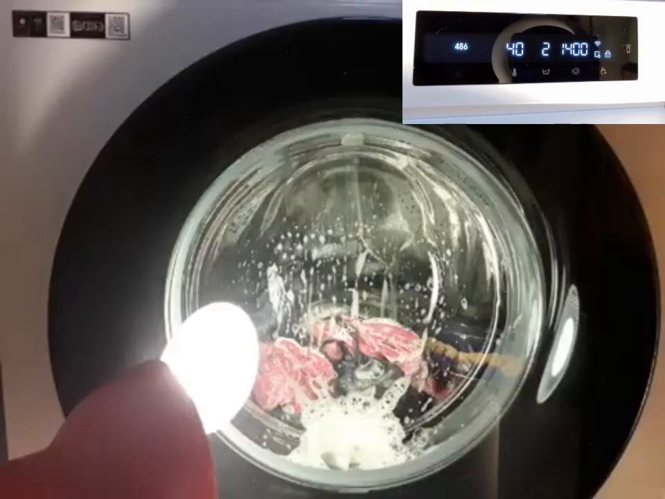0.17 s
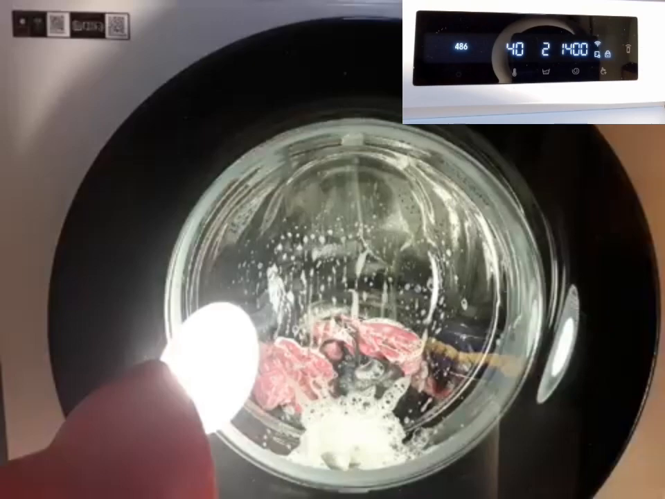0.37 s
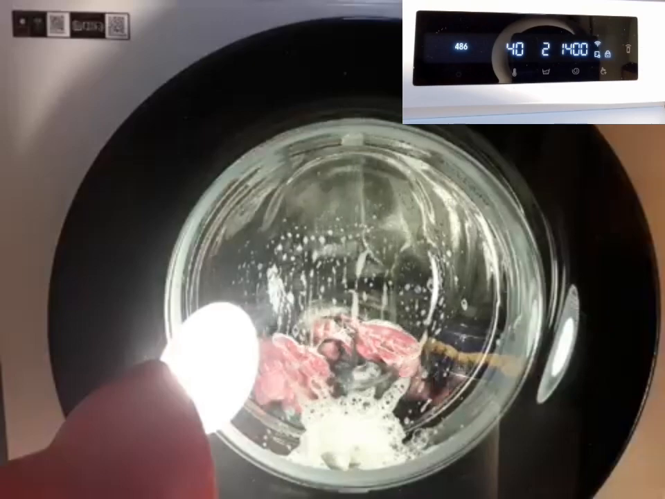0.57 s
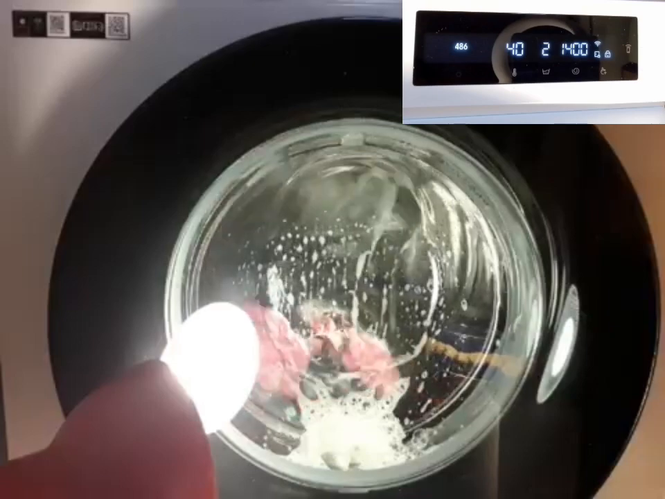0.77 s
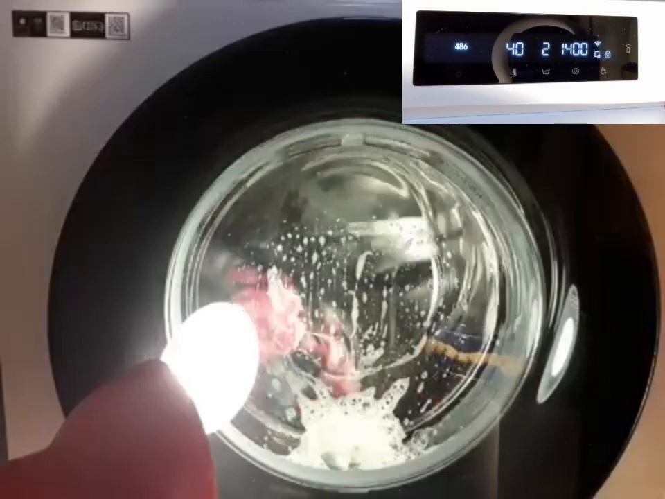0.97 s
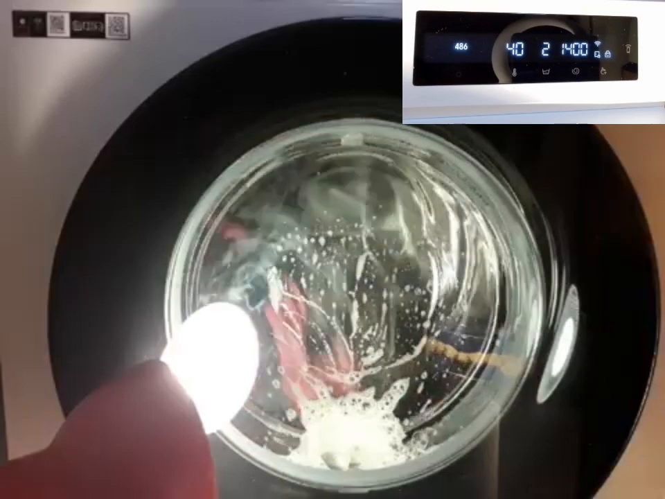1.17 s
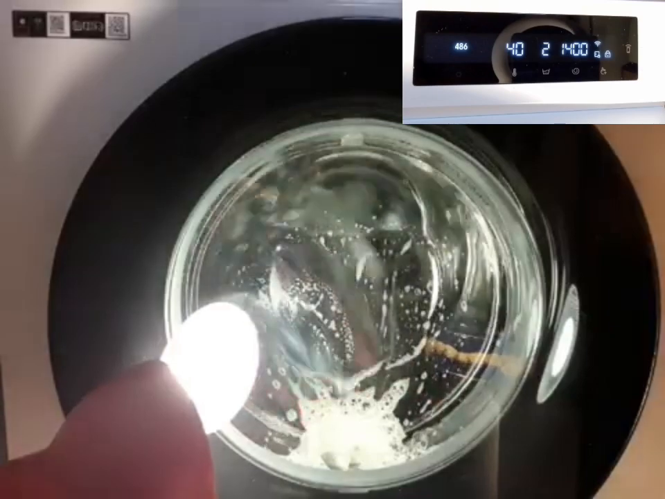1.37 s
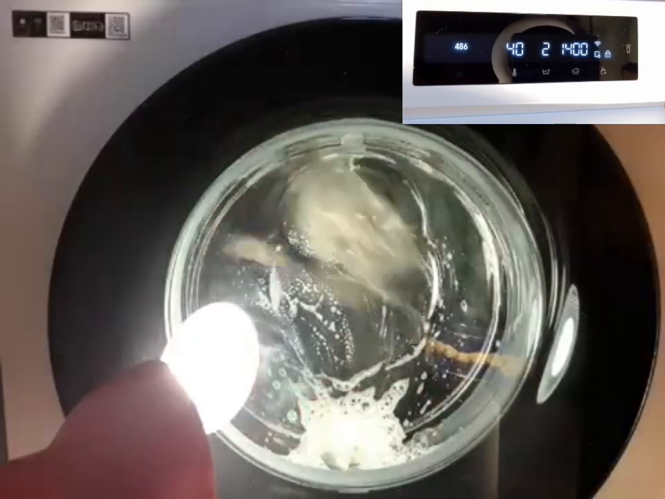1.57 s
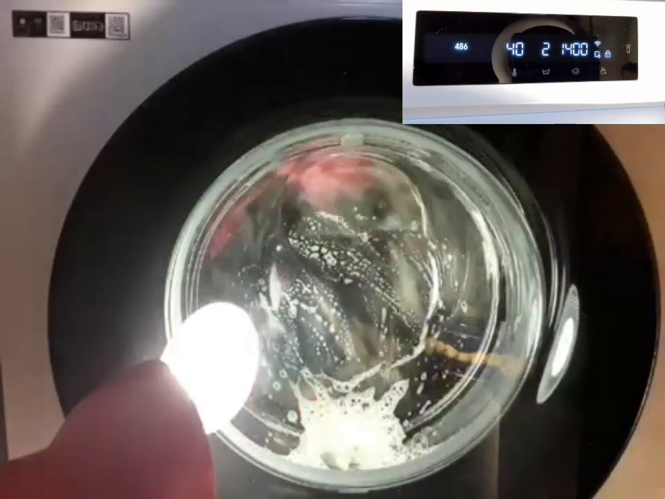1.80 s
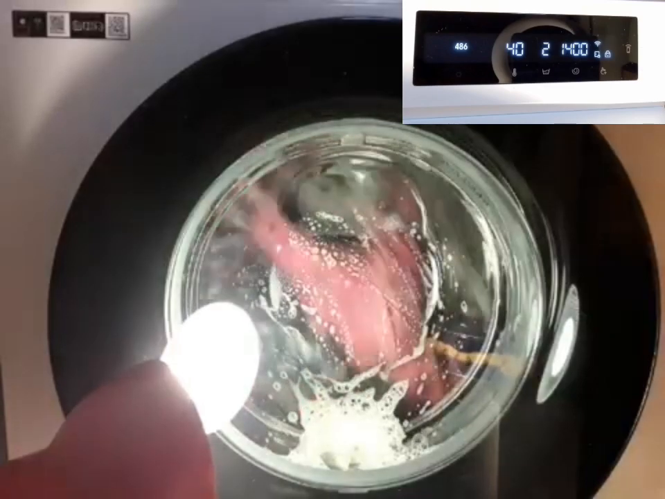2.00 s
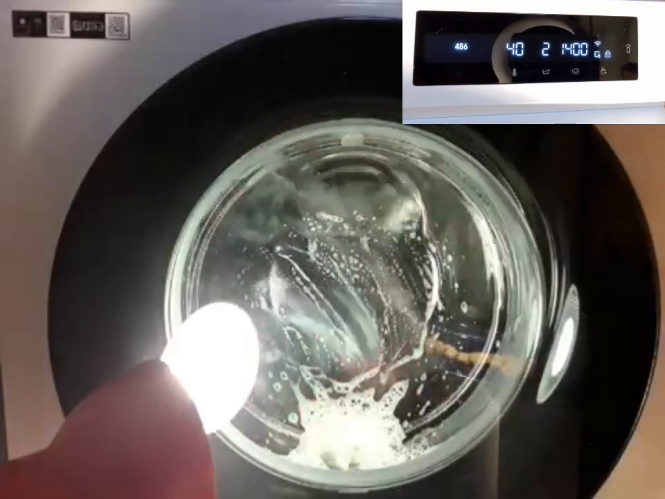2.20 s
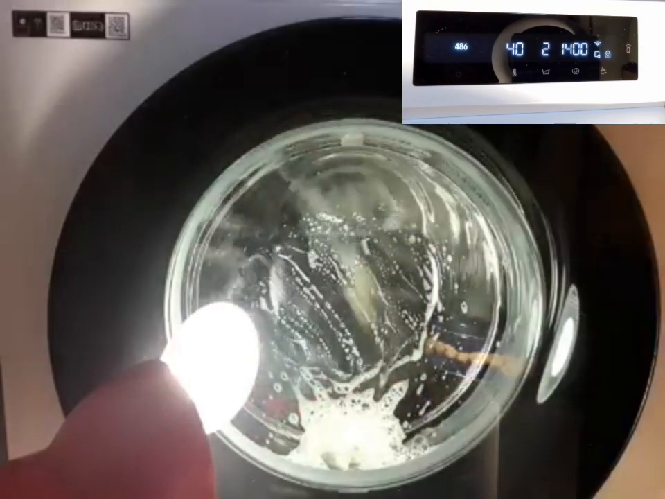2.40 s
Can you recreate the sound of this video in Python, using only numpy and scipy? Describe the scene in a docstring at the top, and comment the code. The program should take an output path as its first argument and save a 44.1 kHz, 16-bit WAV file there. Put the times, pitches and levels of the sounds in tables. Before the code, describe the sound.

Close by in a small room, a washing machine drum begins to turn after a brief hush. Its motor hums softly as water churns and wet laundry falls with hollow thumps and splashes, with one faint rubbery squeal.

```python
"""A front-loading washing machine starts to turn after a pause, in a small hard-walled room.
The motor takes up with a clunk and hums, water sloshes in the drum, and wet rubber sticks and
slips in a thin squeal. Soaked laundry drops with thumps that ring the tub and throw splashes
of droplets. The drive whines faintly throughout."""
import sys
import numpy as np
from scipy import signal
from scipy.fft import rfft, irfft, next_fast_len
from scipy.io import wavfile
from scipy.ndimage import map_coordinates

SR = 44100
rng = np.random.default_rng(int(sys.argv[2]) if len(sys.argv) > 2 else 0)


def digitize_waveform(pressure):
    """Quantize a signal to 16-bit integers and store it at the path in sys.argv[1].

    Rows of a 2-D input are taken as channels; values are limited to [-1, 1].
    """
    field = np.atleast_2d(pressure).T
    bounded = np.clip(field, -1, 1)
    quanta = np.round(bounded * 32767).astype(np.int16)
    wavfile.write(sys.argv[1], SR, quanta)


N = 107912
T = np.arange(N) / SR


def amp(db):
    """Decibels to gain."""
    return 10 ** (np.asarray(db) / 20)


def unit(x):
    """Scale to rms 1."""
    return x / np.sqrt(np.mean(x ** 2) + 1e-20)


def eq(points):
    """An EQ curve through (Hz, dB) points on a log axis: gain as a function of frequency."""
    point_hz, db = np.transpose(points)
    return lambda hz: amp(np.interp(np.log(hz + 1), np.log(point_hz), db))


def curves(rows):
    """Automation: one value per sample for each column after the time."""
    times, *columns = np.transpose(rows)
    return [np.interp(T, times, column) for column in columns]


def wobble(rate):
    """A smooth random curve, rate knots a second."""
    return map_coordinates(rng.standard_normal(int(N * rate / SR) + 4), [T * rate])


def filtered(x, response):
    """Shape the spectrum of x by a gain that depends on frequency."""
    size = next_fast_len(N + SR // 2)
    return irfft(rfft(x, size) * response(np.fft.rfftfreq(size, 1 / SR)), size)[:N]


def noise(response):
    """Coloured noise of rms 1."""
    return unit(filtered(rng.standard_normal(N), response))


def phase(hz):
    """Running phase of a moving pitch."""
    return 2 * np.pi * np.cumsum(hz) / SR


def burst(start, rise, t60, hold=0):
    """Envelope: a straight rise, a hold, then an exponential decay; times in seconds."""
    age = np.maximum(T - start, 0)
    return np.minimum(age / rise, 1) * amp(-60 * np.maximum(age - rise - hold, 0) / t60)


def room(x, tail_db=5.5):
    """Close hard walls add a short dense tail."""
    tail = rng.standard_normal(N) * burst(0.002, rise=0.0046, t60=0.23)
    return x + amp(tail_db) * signal.fftconvolve(x, tail / np.linalg.norm(tail))[:N]


# The colour of the quiet room. Each row: frequency in Hz, gain in dB.
ROOM_TONE_EQ = [(25, -8), (120, 1.5), (280, -2.5), (400, -8.5), (510, -6.5), (650, -14.5), (900, -18.5),
                (1500, -24), (2200, -24.5), (3200, -32), (5000, -36.5), (7600, -23.5), (9200, -24),
                (10500, -31.5), (11500, -24), (12500, -33), (13200, -26), (15000, -33.5)]


def room_tone(level_db=-71, swell_db=2):
    """A low bed of noise that swells slightly at the start."""
    return amp(level_db + swell_db * np.minimum(T / 0.34, 1)) * noise(eq(ROOM_TONE_EQ))


def drive_whine(idle_hz=11810, idle_db=-78, load_hz=112, load_db=4, jitter_hz=110):
    """The drive's thin unbroken whine rises a little in pitch and level with the load."""
    load = np.clip((T - 0.93) / 0.45, 0, 1)
    tone = np.sin(phase(idle_hz + load_hz * load + jitter_hz * wobble(900)))
    flutter = 1 + 0.25 * wobble(400)
    return amp(idle_db + load_db * load) * flutter * tone


# Blows on the tub. Each row: start in seconds, level in dB, brightness in Hz, low cut in Hz,
# contact time in seconds, pitch of the trapped air pocket in Hz, its level over the blow in dB.
BLOWS = [(.203, -74.5, 593, 250, 0.058, 283, 8.5), (0.449, -71, 880, 200, 0.0035, 620, -5),
         (.652, -55.5, 500, 90, 0.031, 251.5, 2.5), (.947, -53.5, 533, 170, 0.011, 578.4, 1),
         (1.139, -33, 816, 128, 0.028, 438, -7.5), (1.33, -51, 450, 170, .015, 181, 3),
         (1.393, -26, 735, 260, 0.0063, 617.7, -0.5), (1.416, -26.5, 660, 230, 0.027, 307.4, -7.5),
         (1.467, -29.5, 1530, 214, 0.011, 247, -4), (1.499, -34, 560, 120, 0.009, 174, 1.5),
         (1.736, -54, 330, 152, .02, 238, 2), (1.868, -48.5, 330, 200, 0.0052, 313, 1.5),
         (2.137, -43, 140, 75, 0.032, 131.1, 9), (2.200, -50, 696, 75, 0.022, 125, -12),
         (2.246, -46.5, 650, 90, 0.014, 286.8, 3.5), (2.380, -20.5, 1240, 397, 0.018, 287, -14.5),
         (2.411, -23.5, 816, 270, 0.006, 319, 3)]
# The tub's ringing modes. Each row: pitch in Hz, level in dB, time to fall 60 dB in seconds.
TUB_MODES = [(80, -7, .3), (130, -7, .25), (173, -2, .28), (246, -4, .3), (296, -2, .18), (320, -1, .2),
             (432, 0, .28), (589, -1, .2), (644, 0, .2), (712, -1, .22), (754, -4, .2), (815, -7, .18),
             (908, -5, .17), (1293, -6, .17), (1522, -11, .17)]
# The colour of the tub's lesser modes. Each row: frequency in Hz, gain in dB.
CLATTER_EQ = [(40, -20), (75, 6), (120, -4), (330, 6), (440, -5), (520, -3), (650, 1.5), (950, -4),
              (1100, -6), (1900, -9.5), (2800, -17), (4000, -14), (7500, 7.5), (12000, -13)]


def thumps(attack_s=0.0015, slap_db=-1, ring_db=-8, clatter_db=-2.5):
    """Each blow slaps, then rings the tub, a clatter of lesser modes and air under the cloth."""
    out = np.zeros(N)
    for start, db, bright_hz, low_hz, contact_s, pocket_hz, pocket_db in BLOWS:
        def contact(hz):
            """The band a blow excites: soft contact dulls the top."""
            return 1 / np.sqrt((1 + (hz / bright_hz) ** 7.76) * (1 + (low_hz / (hz + 1)) ** 5))

        phase_per_hz = 2 * np.pi * np.maximum(T - start, 0)
        ring = np.zeros(N)
        for k, (hz, mode_db, t60) in enumerate(TUB_MODES):
            strength = contact(hz) * amp(mode_db + rng.normal(0, 2))
            envelope = burst(start, attack_s + 0.5 / hz, t60, hold=contact_s / 2)
            detuned_hz = hz * (1 + rng.normal(0, 0.0051))
            ring += (-1) ** k * strength * envelope * np.sin(detuned_hz * phase_per_hz)
        clatter = noise(lambda hz: eq(CLATTER_EQ)(hz) * contact(hz))
        clatter *= burst(start, attack_s, t60=0.31, hold=contact_s)
        pocket = np.sin(pocket_hz * phase_per_hz) * burst(start, rise=0.0032, t60=0.25, hold=contact_s)
        slap = np.sin(0.726 * bright_hz * phase_per_hz) * burst(start, rise=1 / bright_hz, t60=0.026)
        out += amp(db) * (amp(slap_db) * slap + amp(ring_db) * ring
                          + amp(clatter_db) * clatter + amp(pocket_db) * pocket)
    return out


def bubbles(per_s, centre_hz, cycles, spread=0.265, glide=0.3, scatter_db=3):
    """A stream of small ringing bubbles whose pitch rises as they fade; rms 1."""
    draws = rng.uniform(0.001, 0.999, (int(per_s * N / SR), 3))
    when, pitch, strength = np.hsplit(draws, 3)
    hz = np.clip(centre_hz * (pitch / (1 - pitch)) ** spread, 80, 12000)
    t = np.arange(SR // 25) / SR
    life = t * hz / cycles  # reaches 1 when the bubble is 60 dB down
    ring = np.sin(2 * np.pi * hz * t * (1 + glide * np.minimum(life, 1) / 2)) * amp(-60 * life)
    ring *= amp(-scatter_db * np.log(np.maximum(strength, 0.04)))  # a few stand out
    samples = (when * N).astype(int) + np.arange(len(t))
    return unit(np.bincount(samples.ravel(), ring.ravel(), N)[:N])


def droplets():
    """Dense droplets pinging in the room, on a hiss."""
    return rng.standard_normal(N) + amp(-6) * room(bubbles(per_s=900, centre_hz=2680, cycles=4.1))


# Water moving in the drum. Each row: time in seconds, body level in dB, fizz level in dB.
SLOSH_LEVELS = [(.62, -110, -110), (.7, -70, -94), (.85, -65, -91), (1.06, -49, -67), (1.12, -53.5, -66.5),
                (1.25, -49.5, -63), (1.38, -46, -60), (1.56, -39.5, -58), (1.7, -48, -61.5),
                (1.83, -43.5, -61), (1.96, -53.5, -66), (2.03, -49.5, -64.5), (2.09, -41.5, -65.5),
                (2.16, -45.5, -66.5), (2.27, -37, -58), (2.34, -47, -64), (2.44, -38.5, -57)]
# The hollow colour of the water's body. Each row: frequency in Hz, gain in dB.
WATER_EQ = [(30, -40.5), (70, -5), (130, 3.5), (165, -1.5), (215, 0.5), (280, 0), (350, -5), (432, 1.5),
            (510, -10), (620, -4.5), (900, -10.5), (1300, -19), (2200, -42), (4000, -62)]
# The bright colour of the suds. Each row: frequency in Hz, gain in dB.
SUDS_EQ = [(400, -18), (1200, 2.5), (2000, -5.5), (3000, -14.5), (4500, -19.5), (6200, -14.5), (7700, -8),
           (9500, -17.5), (14000, -22)]


def slosh(bubble_db=-3, surge_db=1.5):
    """Churning water: a hollow body with bubbles in it, and fizzing suds above."""
    body_db, fizz_db = curves(SLOSH_LEVELS)
    churn = noise(eq(WATER_EQ))
    gurgle = room(bubbles(per_s=220, centre_hz=423.5, cycles=35))
    body = unit(churn + amp(bubble_db) * unit(filtered(gurgle, eq(WATER_EQ))))
    fizz = unit(filtered(droplets(), eq(SUDS_EQ)))
    return amp(surge_db * wobble(24.91)) * (amp(body_db) * body + amp(fizz_db) * fizz)


# The partials of the motor's hum. Each row: pitch in Hz, level in dB.
HUM_PARTIALS = [(125, -57), (248, -58)]


def motor_hum(start_s=0.64, rise_s=0.07, fall_db_per_s=5, flutter_db=2.5, waver=0.02566, rough=0.32):
    """A rough, wavering hum, strongest as the motor starts."""
    age = np.maximum(T - start_s, 0)
    effort = np.minimum(age / rise_s, 1) * amp(-fall_db_per_s * age)
    hum = np.zeros(N)
    for hz, db in HUM_PARTIALS:
        level = amp(db + flutter_db * wobble(22))
        tone = np.sin(phase(hz * (1 + waver * wobble(29.9))))
        growl = noise(lambda f: 1 / (1 + ((f - hz) / 45) ** 2))  # a narrow band around the partial
        hum += level * (tone + rough * growl)
    return effort * hum


# Water thrown against the door and drum. Each row: start in seconds, level in dB, then rise,
# hold and time to fall 60 dB in seconds, and the fine spray's level over the coarse splash in dB.
SPLASH_HITS = [(0.661, -73, .004, 0.023, 0.23, -28), (1.063, -62, .002, .015, 0.22, 9),
               (1.137, -53.5, 0.003, 0.014, 0.29, 0.5), (1.391, -42, 0.0049, 0.018, 0.58, -12.5),
               (1.498, -30.5, 0.0054, .015, .23, 0.5), (1.776, -55.5, 0.0069, 0.013, 0.2, -4.5),
               (2.183, -45, 0.0048, 0.027, 0.17, -10.5), (2.24, -53, 0.0073, 0.012, 0.12, 2.5),
               (2.380, -36, .003, 0.013, 0.23, -12)]
# The colour of a splash. Each row: frequency in Hz, gain in dB.
SPRAY_EQ = [(100, -29), (400, -0.5), (900, 0.5), (2100, -8), (2900, -13.5), (4300, -21), (5600, -16),
            (6600, -20.5), (7500, -12.5), (8300, -20.5), (9300, -37), (11000, -37), (15000, -43)]


def splashes():
    """Sudden showers of droplets that die away; the finer the spray, the more treble."""
    out = np.zeros(N)
    for start, db, rise, hold, t60, fine_db in SPLASH_HITS:
        treble_shelf = eq([(1700, 0.0088), (4500, fine_db)])
        shower = unit(filtered(droplets(), lambda hz: eq(SPRAY_EQ)(hz) * treble_shelf(hz)))
        out += amp(db) * burst(start, rise, t60, hold) * shower
    return out


# The rubber's first slip. Each row: time in seconds, pitch in Hz, level in dB.
FIRST_SLIP = [(.90, 4050, -100), (.918, 4250, -88), (.942, 4750, -86), (.955, 4840, -105)]
# Wet rubber rubbing. Each row: time in seconds, pitch in Hz, fundamental and octave levels in dB.
RUBBING = [(.945, 2790, -100, -86), (.98, 3080, -81, -76), (1.035, 3230, -74, -76), (1.105, 3150, -74, -69),
           (1.14, 2960, -74, -79), (1.195, 2990, -75, -87), (1.225, 2955, -75, -71.5),
           (1.245, 3050, -68, -71), (1.27, 2890, -71, -78), (1.295, 2920, -74, -64.5),
           (1.345, 2912, -71.5, -71), (1.365, 2830, -69, -83), (1.40, 2700, -69, -89)]
# How far the squeal breaks up. Each row: time in seconds, roughness (0 is none, 1 or more is full).
BREAKUP = [(1.09, 0), (1.14, 1.14), (1.26, 0.87), (1.29, 0), (1.34, 0), (1.38, .8)]


def rubber_squeal(jitter=0.004, rough_jitter=0.016, flutter_db=1, rough_db=3, room_mix=0.6):
    """Wet rubber gives one rising chirp, then sticks and slips in a thin tone that breaks up at times."""
    def gate(rows):
        """Open from the first row to the last, with 10 ms fades."""
        return np.clip(np.minimum(T - rows[0][0], rows[-1][0] - T) / 0.01, 0, 1)

    hz, fundamental_db, octave_db = curves(RUBBING)
    rough = np.clip(curves(BREAKUP)[0], 0, 1)
    angle = phase(hz * (1 + jitter * wobble(500) + rough_jitter * rough * wobble(110)))
    overtones = np.sin(2 * angle) + amp(-16) * np.sin(3 * angle)
    tone = amp(fundamental_db) * np.sin(angle) + amp(octave_db) * overtones
    chirp_hz, chirp_db = curves(FIRST_SLIP)
    chirp = amp(chirp_db) * np.sin(phase(chirp_hz))
    flutter = amp((flutter_db + rough_db * rough) * wobble(120))
    direct = (gate(RUBBING) * tone + gate(FIRST_SLIP) * chirp) * flutter
    return (1 - room_mix) * direct + room_mix * room(direct)


def scene():
    """The machine over the quiet of the room, in mono."""
    mix = room_tone() + thumps() + splashes() + slosh() + motor_hum() + drive_whine() + rubber_squeal()
    return mix[None]


def record(dry):
    """A brick-wall low-pass takes off the very top."""
    return filtered(dry[0], lambda hz: hz < 15030)[None]


dry = scene()
out = record(dry)
digitize_waveform(out)
```